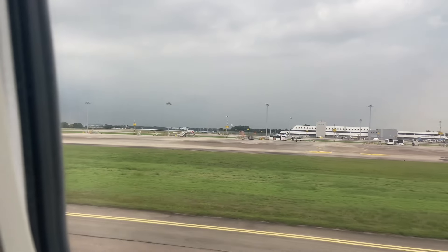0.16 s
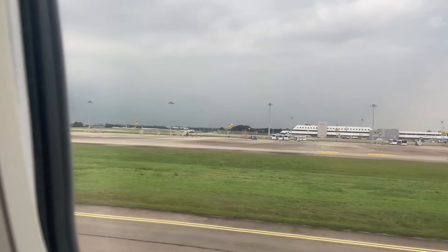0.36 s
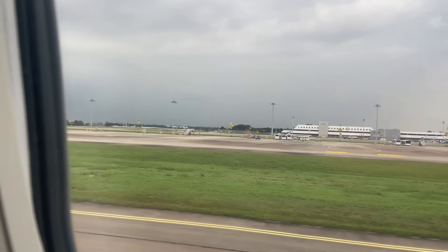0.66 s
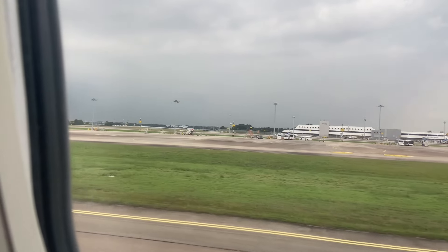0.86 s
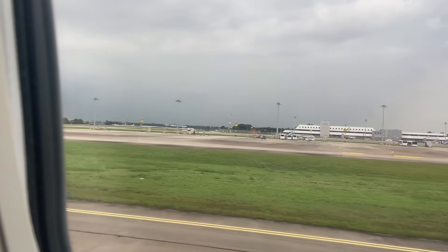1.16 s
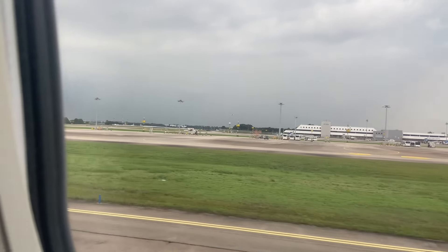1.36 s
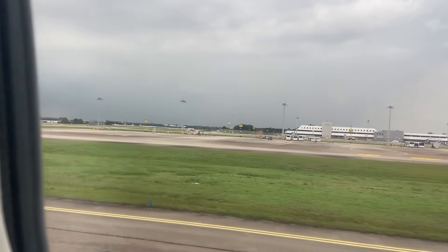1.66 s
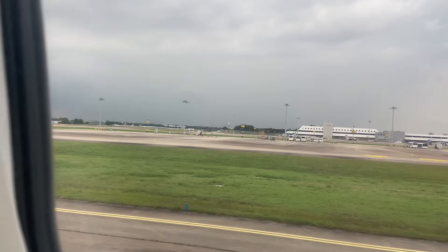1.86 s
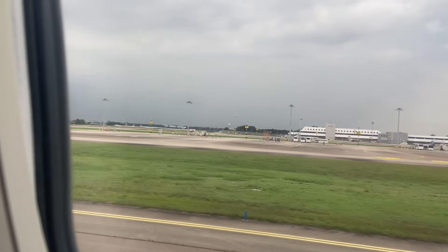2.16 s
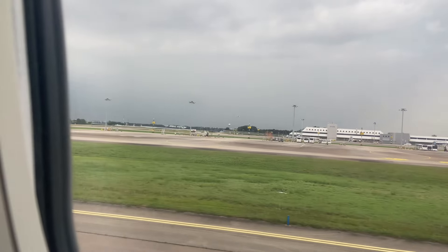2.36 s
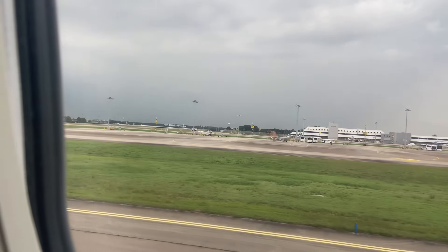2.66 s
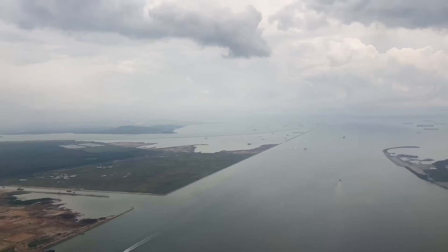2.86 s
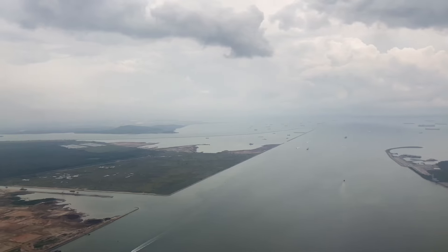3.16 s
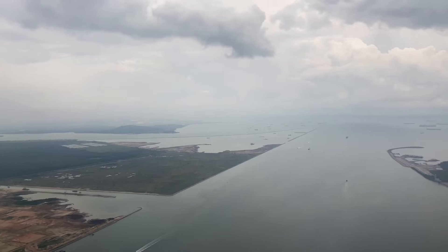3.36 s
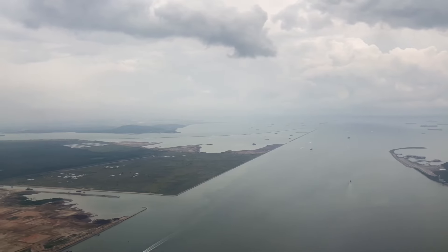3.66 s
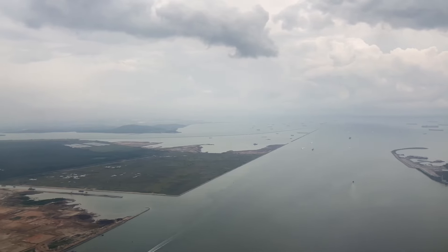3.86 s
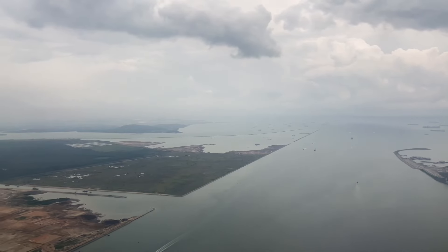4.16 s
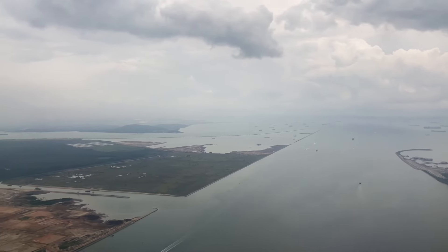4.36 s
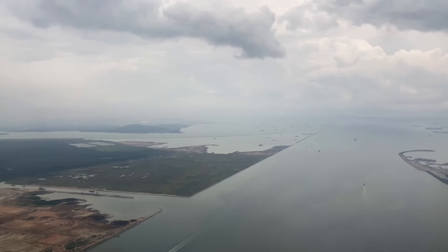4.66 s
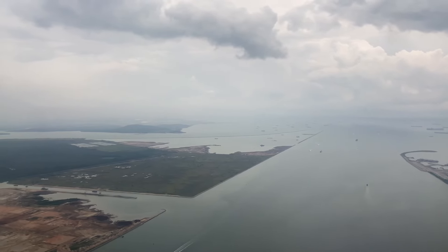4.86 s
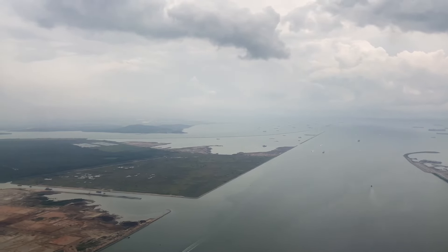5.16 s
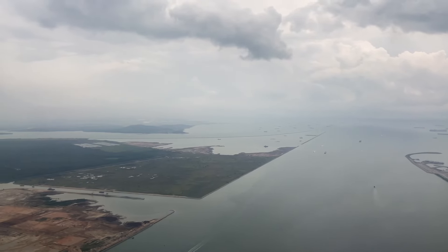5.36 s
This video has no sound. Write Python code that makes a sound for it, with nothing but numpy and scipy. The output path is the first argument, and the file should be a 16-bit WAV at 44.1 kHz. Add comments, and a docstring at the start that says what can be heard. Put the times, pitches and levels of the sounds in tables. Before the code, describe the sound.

Deep jet rumble and soft air hiss inside an airliner cabin, then a hard click cut to a louder, buzzing climb drone.

```python
"""Exhaust rumble shakes the hull and booms in a jet airliner cabin, heard from a window seat.
Two shots are joined by a hard splice that clicks: rolling on the ground, then climbing.
Shaped noise makes boom, roar and the hiss of air at wall and vents; wavering sines make the hums.
A plastic panel ticks once while rolling, as a short burst of filtered noise.
At climb power the fan tips go supersonic: sines at multiples of the shaft speed buzz."""
import sys
import numpy as np
from scipy import signal
from scipy.fft import rfft, irfft, next_fast_len
from scipy.io import wavfile
from scipy.ndimage import uniform_filter1d

SR = 44100
rng = np.random.default_rng(int(sys.argv[2]) if len(sys.argv) > 2 else 0)


def wav_record(signal):
    """Record a signal, one row per channel, as 16-bit PCM in the file named by sys.argv[1]."""
    frames = np.transpose(np.atleast_2d(signal))
    bounded = np.clip(frames, -1, 1)
    # unit amplitude maps onto the largest positive 16-bit level
    quanta = np.round(bounded * 32767).astype(np.int16)
    wavfile.write(sys.argv[1], SR, quanta)


N = 242550
SPLICE_S = 2.73313


def gain_of(db):
    """Amplitude factor of a level in dB."""
    return 10 ** (np.asarray(db) / 20)


def evened(x):
    """Scale to rms 1."""
    return x / np.sqrt(np.mean(x ** 2) + 1e-20)


def wander(n, hz):
    """Slow chance of rms 1: noise rolled off steeply above hz."""
    z = rfft(rng.standard_normal(n))
    rolloff = 1 + (np.fft.rfftfreq(n, 1 / SR) / hz) ** 4
    return evened(irfft(z / rolloff, n))


def read(table, hz):
    """Interpolate each column of a table over log frequency."""
    f, *columns = np.transpose(table)
    return [np.interp(np.log(hz + 1), np.log(f), column) for column in columns]


def air(n, colour, rings, ports, port_gap_s=1 / 3750, straight=0.99, straight_hz=8300):
    """Spectrum of a random pressure field at two ports; top treble comes from the right, left port late."""
    hz = np.fft.rfftfreq(n, 1 / SR)
    db = read(colour, hz)[0]
    for f, width_hz, lift_db in rings:
        db = db + lift_db / (1 + (2 * (hz - f) / width_hz) ** 2)

    port_rows = [(f, pan_db, like * np.cos(lead), -like * np.sin(lead)) for f, pan_db, like, lead in ports]
    pan_db, real, imag = read(port_rows, hz)
    direct = 1 / (1 + (straight_hz / (hz + 1)) ** 12)
    link = (1 - direct) * (real + 1j * imag)
    link = link + direct * straight * np.exp(2j * np.pi * hz * port_gap_s)
    link /= np.maximum(abs(link), 1)
    pan_db = (1 - direct) * pan_db

    a, b, c, d = rng.standard_normal((len(hz), 4)).T
    left = a + 1j * b
    unlike = np.sqrt(np.maximum(1 - abs(link) ** 2, 0)) * (c + 1j * d)
    right = link * left + unlike
    return hz, gain_of(db) * np.array([left * gain_of(pan_db / 2), right * gain_of(-pan_db / 2)])


def patchy(x, patch_db, bins=4, frames=8):
    """Level of small patches of time and pitch varies at random by patch_db rms."""
    z = signal.stft(x, nperseg=1024, noverlap=768)[2]
    patches = uniform_filter1d(rng.standard_normal(z.shape[:0:-1]), frames, axis=0)
    patches = evened(uniform_filter1d(patches, bins, axis=1))
    z = z * gain_of(patch_db * patches.T)
    return signal.istft(z, nperseg=1024, noverlap=768)[1][:, :x.shape[1]]


def cabin(t0_s, n, curve, hiss_curve, field, steady=0.65, gust_db=0.25, surge_db=0.06, surge_hz=7.7):
    """Boom, roar and hiss share one pressure field; each follows its own level over time."""
    boom_top_hz, roar_top_hz = 90, 520
    size = next_fast_len(n)
    hz, z = air(size, *field)
    low = 1 / (1 + (hz / boom_top_hz) ** 12)
    high = 1 / (1 + (roar_top_hz / (hz + 1)) ** 12)
    boom, roar, hiss = (irfft(z * band, size)[:, :n] for band in (low, 1 - low - high, high))

    # the boom is one cabin mode: its swing is more even than noise
    swing = abs(signal.hilbert(evened(boom.mean(0)), size)[:n])
    boom = boom / (uniform_filter1d(swing, 600) + 0.082) ** steady
    boom = boom * gain_of(surge_db * wander(n, surge_hz))
    hiss = patchy(hiss, patch_db=1.52) * gain_of(gust_db * wander(n, 34.0))
    roar = patchy(roar, patch_db=0.3)

    t = t0_s + np.arange(n) / SR
    s, boom_db, roar_db = np.transpose(curve)
    boom_level_db, roar_level_db = np.interp(t, s, boom_db), np.interp(t, s, roar_db)
    hiss_level_db = np.interp(t, *np.transpose(hiss_curve))
    layers = [(boom, boom_level_db), (roar, roar_level_db), (hiss, hiss_level_db)]
    return sum(x / np.std(x.mean(0)) * gain_of(db) for x, db in layers)


def tones(turns, rows, waver_db, waver_hz, swells=()):
    """Sines at multiples of one turning count; each wavers in level, and some swell or fade."""
    # Times of the swell columns, in seconds from the start of the tones.
    swell_s = (.2, .7, 1.3, 1.9, 2.6)
    n = len(turns)
    out, coarse = np.zeros((2, n)), np.arange(0, n + 400, 200)
    swell = {multiple: change_db for multiple, *change_db in swells}
    for multiple, left_db, right_db, lead_rad in rows:
        angle = 2 * np.pi * (multiple * turns + rng.random())
        # hz times 200: the waver is drawn at one point per 200 samples
        waver = evened(gain_of(waver_db * wander(len(coarse), 200 * waver_hz)))
        change_db = swell.get(multiple, np.zeros(len(swell_s)))
        waver = waver * gain_of(np.interp(coarse / SR, swell_s, change_db))
        # sqrt 2: row levels are rms
        waver = np.sqrt(2) * np.interp(np.arange(n), coarse, waver)
        out[0] += gain_of(left_db) * waver * np.sin(angle + lead_rad)
        out[1] += gain_of(right_db) * waver * np.sin(angle)
    return out


def hums(n, rows, drift):
    """Hums of pumps and engine core: sines whose pitch drifts together by a small share."""
    seconds = np.cumsum(1 + drift * wander(n, 1.6)) / SR
    return tones(seconds, rows, waver_db=2.5, waver_hz=2.25)


def rolling(n):
    """On the ground: exhaust rumble, air hiss and hums at low power."""
    # Boom and roar levels over time, loosely uneven.
    # Each row: time in seconds, boom level in dB, hull roar level in dB.
    levels = [(0.0, -11, -23), (0.3, -18.5, -22), (0.55, -19.5, -21), (0.8, -17.5, -23), (1.1, -17, -21),
              (1.4, -18, -23), (1.6, -20, -22), (1.95, -15, -22), (2.15, -21, -21.5), (2.35, -14.5, -22),
              (2.58, -18.5, -22.5), (2.72, -12.5, -21.5)]
    # Hiss level over time. Each row: time in seconds, level in dB.
    hiss_levels = [(0, -42), (1.4, -41.5), (2.73, -42)]
    # Noise colour, rumble then hiss. Each row: frequency in Hz, relative density in dB.
    rumble, hiss = [(22, -64), (32, -66.5), (45, -53.5), (62, -47), (80, -49.5), (95, -50.5), (120, -50),
                    (150, -47.5), (180, -48.5), (240, -46.5), (280, -53.5), (345, -52), (410, -64),
                    (500, -62)], [(550, -69.5), (620, -63.5), (800, -69.5), (1000, -69.5),
                                         (1080, -74.5), (1450, -72.5), (1700, -77), (2050, -76),
                                         (2400, -78.5), (3500, -82), (5000, -87.5), (7000, -95.5),
                                         (9000, -101.8), (15500, -116)]
    # Wall panels and vents in the airflow. Each row: centre in Hz, width in Hz, lift (or dip) in dB.
    rings = [(445, 24, 6), (64, 12, 3), (88, 10, -6), (101, 10, 3), (286, 16, 4), (315, 24, -4),
             (375, 16, 2), (575, 20, 3), (790, 40, 2), (760, 14, 7), (820, 30, 6), (985, 50, 7),
             (1070, 70, -3), (1184, 20, 4), (2040, 60, 2), (1604, 30, 6), (1720, 25, 3), (2120, 90, 3),
             (2190, 40, 3), (2270, 50, -3), (2307, 16, 4), (2370, 100, -2), (2530, 25, 5), (2704, 30, 5),
             (3330, 120, 2), (3990, 60, 4), (5292, 30, 5), (5604, 12, 6), (6481, 14, 7), (11000, 2500, 4)]
    # Port differences. Each row: frequency in Hz, left-right in dB, likeness 0-1, left lead in rad.
    ports = [(62, -0.3, 1.0, -0.2), (240, 0.4, 0.96, -0.2), (345, -0.9, 0.83, 0.1), (480, 0, 0.2, 0.8),
             (620, 1.2, 0.62, 2.6), (1080, 0.3, 0.5, 2.6), (1450, -1.9, 0.6, -2.7), (2050, -2.6, 0.3, 0.3),
             (3500, 0.2, 0.25, 2.2), (7000, 1.0, 0.3, 0.2)]
    # Hums. Each row: frequency in Hz, left rms in dB, right rms in dB, left lead in rad.
    hum_rows = [(340.8, -42, -38, .5), (502.3, -59, -47, -2.8), (1152.8, -67, -63, -3.1),
                (2704, -64, -64, 0)]
    noise = cabin(0, n, levels, hiss_levels, (rumble + hiss, rings, ports))
    return noise + hums(n, hum_rows, drift=0.00314)


def trim(t60_s=0.027, rise_s=0.0011, low_hz=3000, high_hz=10000):
    """Small dry ticks of plastic panels: decaying noise bursts through a band filter."""
    # Each row: start in seconds, level ahead of the filter in dB, left-right in dB.
    ticks = [(1.191, -37, -1)]
    out, t = np.zeros((2, N)), np.arange(1500) / SR
    bright = signal.butter(2, [low_hz, high_hz], "band", fs=SR)
    envelope = np.minimum(t / rise_s, 1) * gain_of(-60 * t / t60_s)
    for s, db, pan_db in ticks:
        burst = signal.lfilter(*bright, rng.standard_normal((2, len(t))) * envelope)
        at = round(s * SR)
        out[:, at:at + len(t)] += burst * gain_of([[db + pan_db / 2], [db - pan_db / 2]])
    return out


def fan_buzz(n, weak_db=-65, fall_db=-.1, spread_db=3.0, buzz_db=.5):
    """Uneven blade shocks sound each shaft multiple; weak ones fall with pitch and scatter by chance."""
    # Strong multiples. Each row: multiple, left rms in dB, right rms in dB, left lead in rad;
    # all but the first two gain buzz_db on top.
    strong = [(1, -14.5, -15.5, -0.2), (2, -26, -22, -0.7), (3, -30, -30, -0.3), (4, -30, -28, 0.6),
              (5, -39, -38, -0.3), (7, -43, -46, 0.5), (8, -43, -41, -0.9), (9, -40, -40, -2.7),
              (10, -61, -46, 2.8), (11, -50, -45, 1.8), (12, -45.5, -59, 1.2), (13, -44.5, -49, 1.7),
              (15, -56, -58, 1.0), (19, -60, -62, 1.0), (20, -63, -53, 2.2), (24, -48.5, -40.5, 3.0),
              (33, -58, -55, -2.9), (34, -63, -55, -1.9), (35, -52, -54, -3.0), (36, -53, -56, -2.3),
              (39, -60, -66, -0.2), (47, -59, -69, -1.1), (48, -60, -80, 0.3), (49, -59, -65, 0.1),
              (58, -65, -68, -0.2), (62, -67, -64, -0.3), (65, -60, -71, 2.1), (67, -64, -76, 0),
              (68, -58, -74, -1.3), (72, -64, -78, 0), (73, -64, -78, 0), (75, -62, -73, 0.4),
              (79, -61, -66, -2.0), (81, -68, -80, 0), (82, -66, -72, 0.2), (83, -68, -80, 0),
              (84, -69, -80, 0), (88, -66, -78, 0)]
    # Swells and fades. Each row: multiple, then level change in dB at each swell time of tones().
    swell_rows = [(1, 0.5, -0.5, -2, -2.5, -10), (2, 3, 0, -3, -4, -6), (4, -4, -2, 3, 1, -2),
                  (9, 0, -2, 1, -2, 2), (10, 2, -1, -2, 0, 1), (11, 4, -2, -8, 1, -7),
                  (12, 1.5, -1.5, -4, -1, -1), (13, -2, -2, 1.5, -1, 0), (24, -5, -2, 0, 0.5, -1),
                  (34, 2, 1, 0, -2, -3), (36, 2, 2, 1, -4, -4)]
    shaft_turns_per_s, slowing_per_s2 = 75.47, .115
    t = np.arange(n) / SR
    turns = np.cumsum(shaft_turns_per_s - slowing_per_s2 * t) / SR

    others = np.setdiff1d(np.arange(1, 90), [row[0] for row in strong])
    chance = rng.standard_normal((len(others), 3))
    level_db = weak_db + fall_db * others[:, None] + spread_db * chance[:, :2]
    weak = np.column_stack([others, level_db, np.pi * chance[:, 2]])

    shake = tones(turns, strong[:2], waver_db=1.0, waver_hz=2.3, swells=swell_rows)
    buzz = tones(turns, strong[2:] + list(weak), waver_db=1.6, waver_hz=3.0, swells=swell_rows)
    return shake + gain_of(buzz_db) * buzz


def climbing(n):
    """Climb power: stronger rumble and hiss, hums, and the buzz of the supersonic fan tips."""
    # Columns of all these tables as in rolling(); times count from the start of the scene.
    levels, hiss_levels = [(2.75, -11, -16.5), (2.95, -14, -15), (3.2, -20, -13), (3.55, -14, -15),
                           (3.8, -12.5, -15), (4.1, -19.5, -13.5), (4.5, -13.5, -15.5), (4.65, -18.5, -13),
                           (4.85, -13, -14), (5.08, -17.5, -16.5), (5.2, -11.5, -13.5),
                           (5.37, -16.5, -13.5), (5.48, -12.5, -13)], [(2.73, -37.5), (3.3, -38.5), (4.3, -38), (5.5, -38.5)]
    rumble, hiss = [(22, -38.5), (32, -46), (45, -34), (54, -25.5), (62, -20), (80, -31.5), (95, -35.5),
                    (120, -30), (150, -38), (180, -37), (240, -41.5), (280, -43), (345, -47.5),
                    (410, -53.5), (500, -60.5)], [(550, -59), (620, -67), (800, -67.5), (1000, -76), (1080, -74),
                                          (1450, -75), (1700, -77.5), (2050, -73), (2400, -79), (3500, -84),
                                          (5000, -88), (7000, -94.5), (9000, -99), (15500, -113)]
    rings, ports = [(84, 6, -3), (93, 12, 4), (120, 16, 2.5), (133, 10, 3), (143, 8, -3), (178, 20, -5),
                    (192, 14, 1.5), (260, 16, 2), (1845, 40, -4), (1885, 30, 3), (205, 50, 2.5),
                    (250, 14, -3), (350, 30, 3), (365, 14, -3), (472, 14, 4), (1320, 90, -2), (1590, 60, 2),
                    (1680, 70, -2), (2530, 40, -4), (1150, 120, 4), (1600, 80, 3), (1900, 100, 2),
                    (2140, 40, 4), (2215, 70, -4), (2336, 14, 6), (3080, 160, -3), (3320, 200, 3),
                    (3600, 300, 2), (4360, 60, 2), (11000, 2500, 4.5)], [(62, -0.1, 1.0, -0.2), (110, 0.5, 0.93, -0.8),
                                         (345, -1.0, 0.81, 0), (500, -2, 0.23, 1.4), (620, 2.2, 0.53, -3.0),
                                         (1000, 0, 0.1, 0.5), (1450, -2.3, 0.49, 3.0),
                                         (2050, 1.6, 0.4, -0.1), (2400, 0.8, 0.1, -3.0),
                                         (4200, 4.6, 0.2, 0), (7000, 2.3, 0.26, 0.2)]
    hum_rows = [(236.9, -26, -38, 0), (498.5, -54, -43, 2.4), (547.2, -36, -42, 3.1),
                (1482.3, -54, -51, 2.3)]
    noise = cabin(SPLICE_S, n, levels, hiss_levels, (rumble + hiss, rings, ports), steady=0.57)
    return noise + fan_buzz(n) + hums(n, hum_rows, drift=0.00201)


def mic_bass_cut(x, low_hz=39.4):
    """The microphone loses the deepest bass."""
    return signal.sosfilt(signal.butter(4, low_hz, "high", fs=SR, output="sos"), x)


def splice(first, second, fade_s=.002):
    """Join two shots: the second starts mid-swing, a sudden step away from the first, so it clicks."""
    # Step of the waveform at the join: left, right [amplitude].
    jump = (-.5, -.44)
    step = np.array(jump) - (second[:, 0] - first[:, -1])
    t = np.arange(second.shape[1]) / SR
    return np.hstack([first, second + step[:, None] * np.exp(-(t / fade_s) ** 2)])


def scene():
    """Roll, then climb, with the panel tick on top."""
    cut = round(SPLICE_S * SR)
    roll = mic_bass_cut(rolling(cut))
    climb = mic_bass_cut(climbing(N - cut))
    return splice(roll, climb) + trim()


def record(dry, knee=.55, ceiling=.935, edge_hz=15760):
    """The loudest swings bend into a soft ceiling; then the band limit."""
    room = ceiling - knee
    over = np.maximum(abs(dry) - knee, 0)
    bent = np.sign(dry) * (np.minimum(abs(dry), knee) + room * np.tanh(over / room))
    lowpass = signal.firwin(511, edge_hz, window=("kaiser", 9), fs=SR)
    return signal.oaconvolve(bent, lowpass[None], "same")


dry = scene()
out = record(dry)
wav_record(out)
```